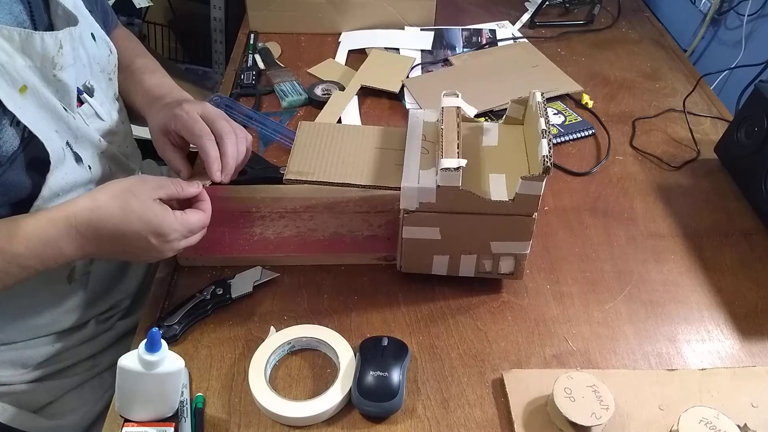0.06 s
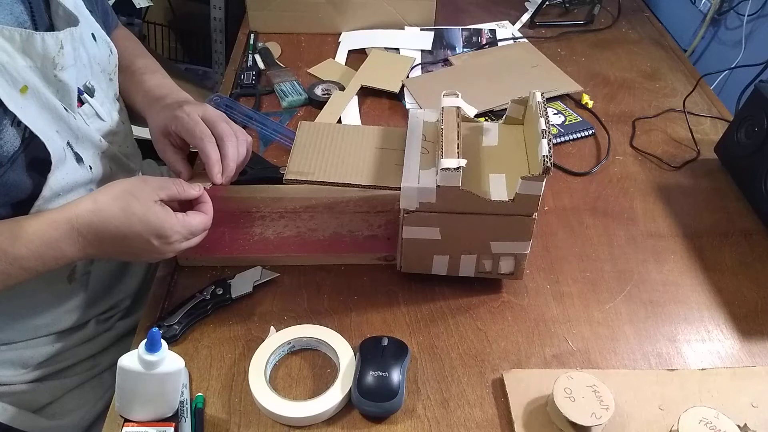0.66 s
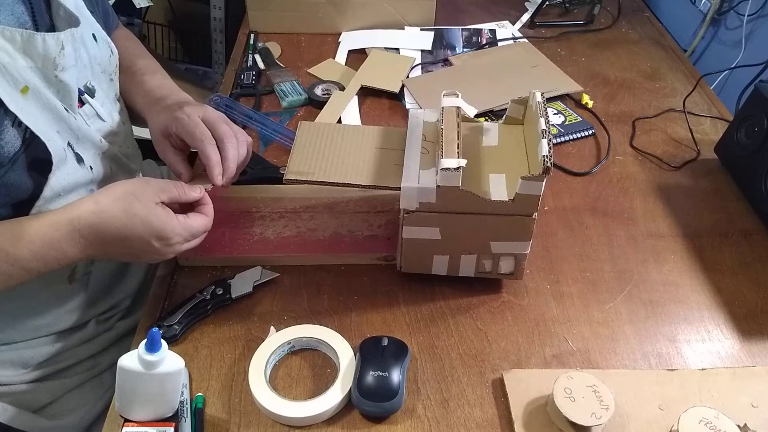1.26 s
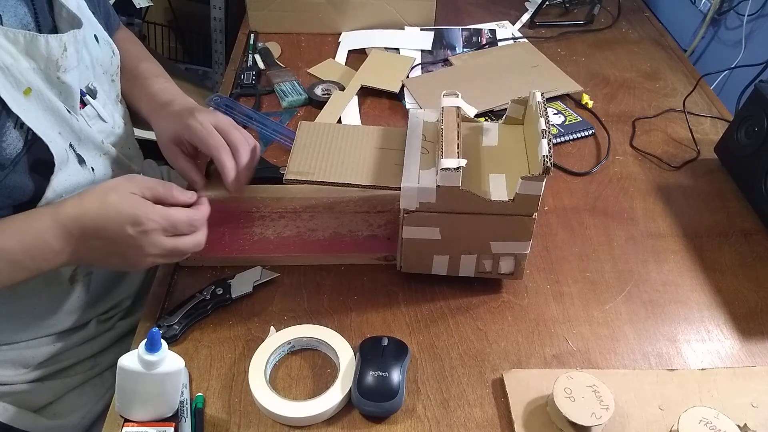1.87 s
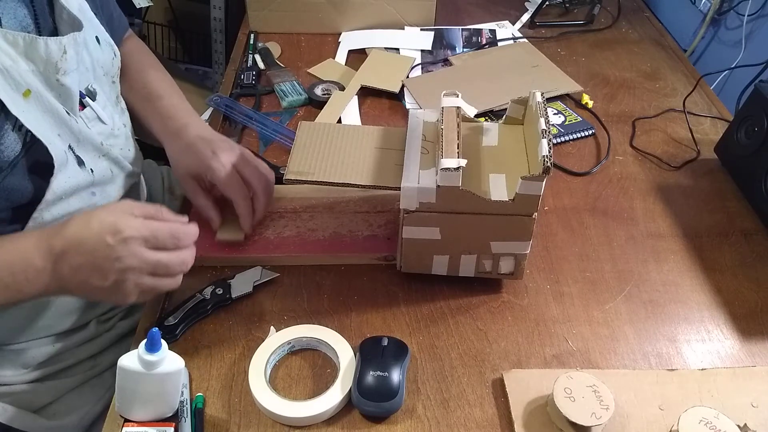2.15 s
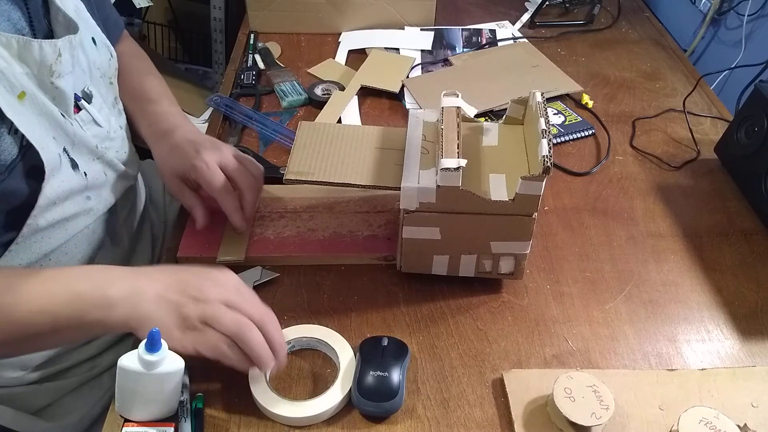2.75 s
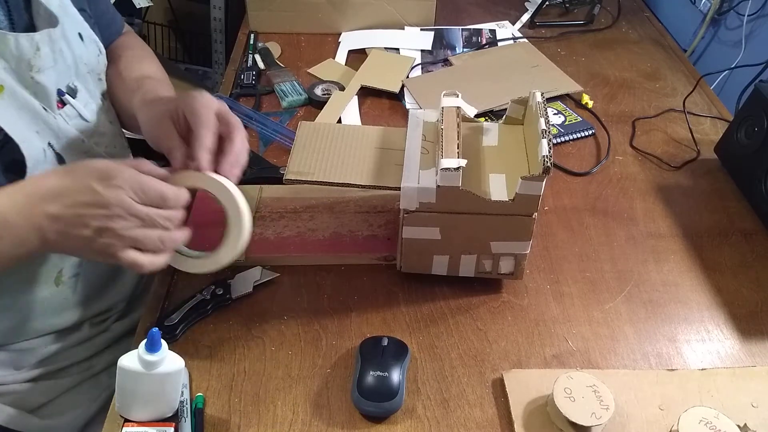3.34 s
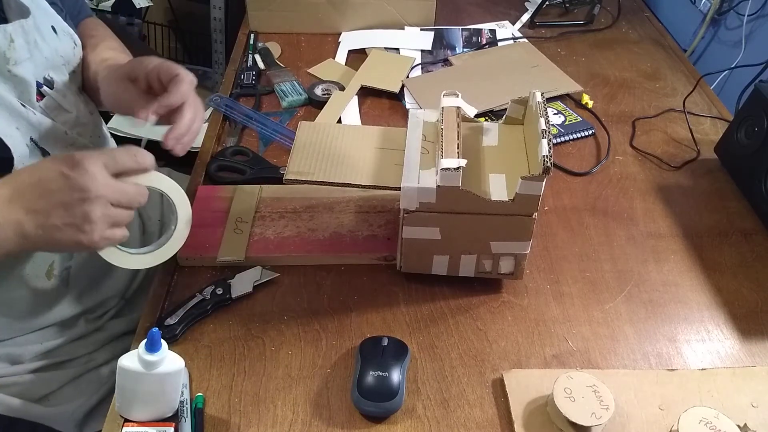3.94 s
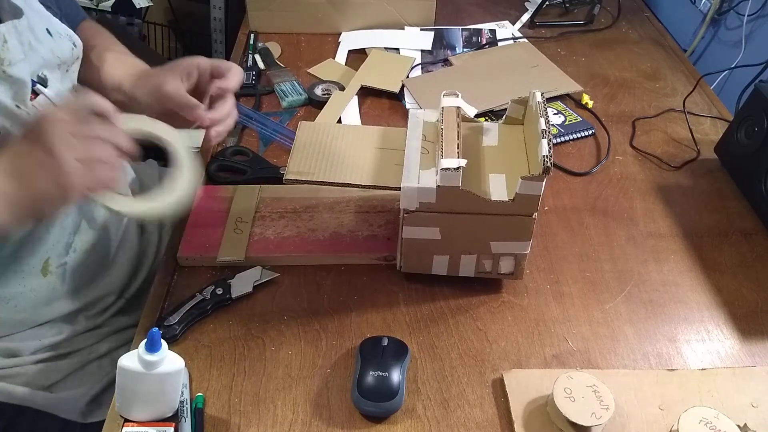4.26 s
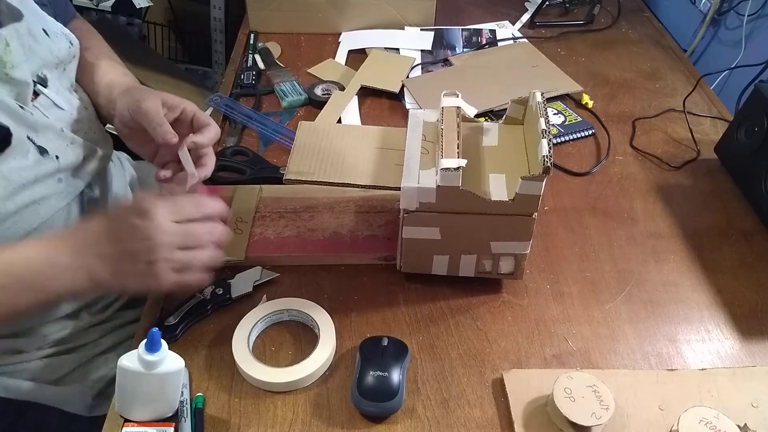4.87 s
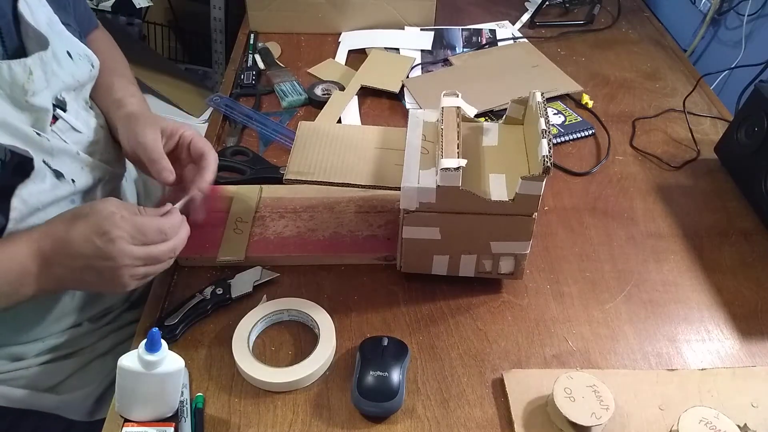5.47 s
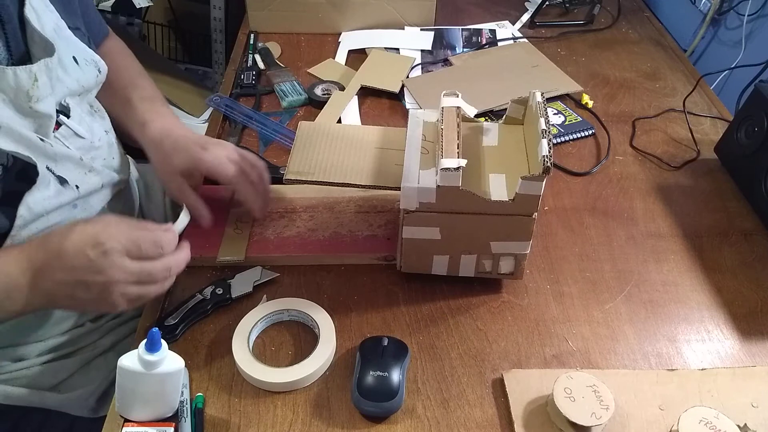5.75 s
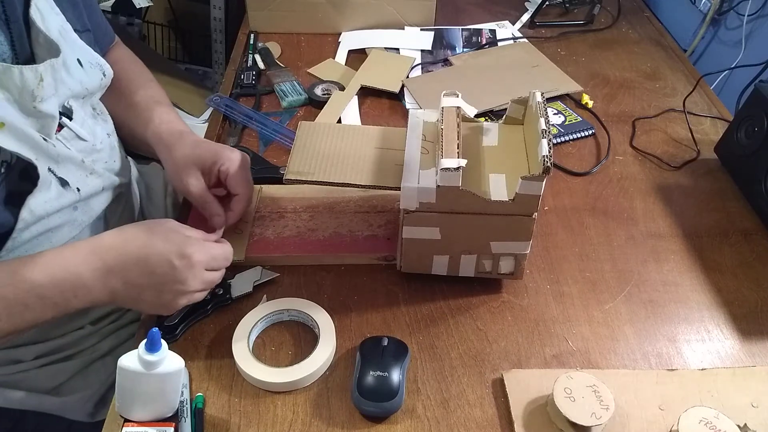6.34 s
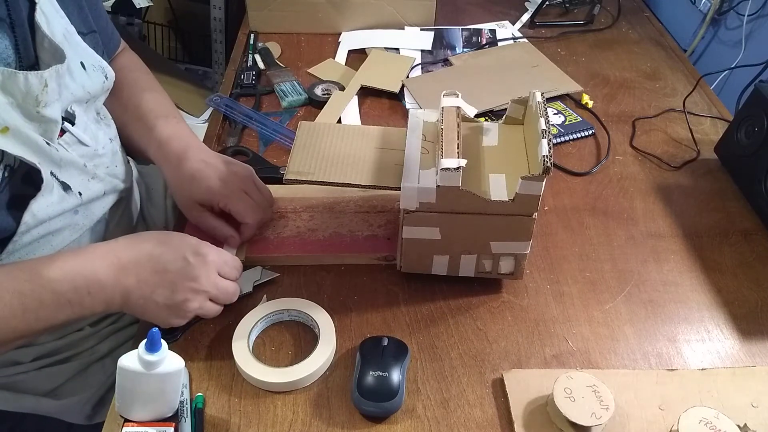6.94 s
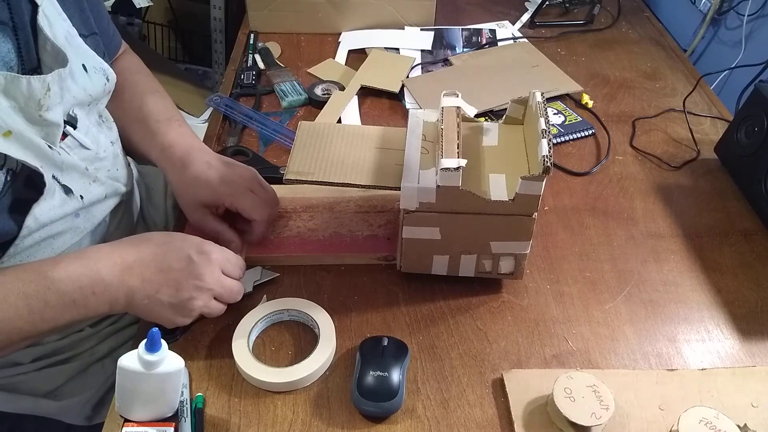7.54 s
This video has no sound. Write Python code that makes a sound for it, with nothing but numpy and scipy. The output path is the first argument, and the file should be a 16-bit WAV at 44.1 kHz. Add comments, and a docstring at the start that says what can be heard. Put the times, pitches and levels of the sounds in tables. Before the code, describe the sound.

Close by at an indoor workbench, a few quiet sticky ticks and soft knocks lead into a brief, buzzing peel of masking tape and a crisp tear. The roll lands on the wood and rattles quickly to rest, ringing slightly. Fingers then crinkle the strip and rub it faintly against cardboard. A fan's low hum and soft hiss fill the small room throughout.

```python
"""Masking tape at a wooden workbench

In a small room, tape rasps off its roll in jerks as the glue sticks and slips, then is snapped off.
The roll drops on the bench, clatters and rings; fingers crinkle the strip and rub it onto cardboard.
A fan hisses and hums throughout. The stereo image is widened, and sharp treble ducks the level."""
import sys
import numpy as np
from scipy import signal
from scipy.fft import rfft, irfft, next_fast_len
from scipy.io import wavfile
from scipy.ndimage import uniform_filter1d

SR = 44100
rng = np.random.default_rng(int(sys.argv[2]) if len(sys.argv) > 2 else 0)


def to_wav(s):
    """Save 16-bit WAV."""
    ch = np.atleast_2d(s).T  # columns
    pcm = np.round(np.clip(ch, -1, 1) * 32767)  # PCM
    wavfile.write(sys.argv[1], SR, pcm.astype(np.int16))


N = 334895
TIME = np.arange(N) / SR

# the jerks that pull tape off the roll: t/s, half length/s, level/dB, slip rate/Hz
JERKS = [(3.586, 0.019, -35.5, 278), (3.605, 0.0055, -25, 220), (3.6133, .0007, -20.5, 280),
         (3.635, 0.0064, -25, 370), (3.649, 0.0051, -22.5, 450), (3.663, 0.005, -21, 330),
         (3.69, .012, -30, 326), (3.705, 0.01, -28, 300), (3.727, 0.0091, -24.5, 330),
         (3.781, 0.02, -33.5, 230), (3.812, 0.0033, -34, 250), (3.832, 0.01, -30.5, 340),
         (3.866, 0.006, -37, 220), (3.933, 0.0095, -40, 210)]
# the roll lands, bounces twice and clatters to rest:
# t/s, level/dB, bass cut/Hz, treble cut/Hz, favoured pitch/Hz, rim crack/dB, crack treble cut/Hz
LANDINGS = [(4.6399, 5, 55, 2660, 637, -5, 6600), (4.716, 3, 120, 2780, 332, -8, 16000),
            (4.7579, 4.5, 160, 2170, 460, -25, 7000), (4.771, -2.5, 600, 2200, 900, -28, 7000),
            (4.7871, -5, 600, 2000, 900, -36, 6000), (4.828, -11, 500, 2200, 1400, -46, 6000),
            (4.866, -20, 500, 2000, 1000, -50, 6000)]


def from_db(db):
    """Decibels to gain."""
    return 10 ** (np.asarray(db) / 20)


def at_hz(points, hz):
    """Read a table on a log-frequency axis."""
    f, value = np.transpose(points)
    return np.interp(np.log(np.maximum(hz, 1)), np.log(f), value)


def low_pass(x, hz):
    """A smooth treble roll-off."""
    return signal.sosfilt(signal.butter(2, hz, fs=SR, output="sos"), x + 1e-18)


def high_pass(x, hz):
    """A smooth bass roll-off."""
    return signal.sosfilt(signal.butter(2, hz, "high", fs=SR, output="sos"), x + 1e-18)


def coloured(x, spectrum, size=4096):
    """A minimum-phase EQ with the given curve: no pre-ring ahead of a transient."""
    gain = from_db(at_hz(spectrum, np.linspace(0, SR / 2, size // 2 + 1)))
    cepstrum = irfft(np.log(gain))
    cepstrum[1:size // 2] *= 2
    cepstrum[size // 2 + 1:] = 0
    return signal.oaconvolve(x, irfft(np.exp(rfft(cepstrum))))[:N]


def resonance(x, hz, width_hz):
    """A band-pass with unity gain at its peak."""
    radius = np.exp(-np.pi * width_hz / SR)
    feedback = [1, -2 * radius * np.cos(2 * np.pi * hz / SR), radius ** 2]
    return signal.lfilter(np.array([1, 0, -1]) * (1 - radius ** 2) / 2, feedback, x + 1e-18)


def swell(s, half_s):
    """A bell-shaped rise and fall."""
    return np.exp(-.5 * np.minimum(((TIME - s) / half_s) ** 2, 100))


def spurt(s, attack_s=0.01, release_s=0.004):
    """A rise to the moment of letting go, then a faster fall."""
    return np.exp(-np.minimum(np.maximum((s - TIME) / attack_s, (TIME - s) / release_s), 20))


def crackle(per_s, spread_db):
    """Glue threads and paper fibres let go at random, with uneven strengths; rms 1."""
    sizes = from_db(spread_db * np.minimum(rng.exponential(1, N), 4))
    clicks = (rng.random(N) < per_s / SR) * sizes * rng.choice([-1, 1], N)
    return clicks / np.sqrt(np.mean(clicks ** 2) + 1e-20)


def burst(s, length_s, size=4096):
    """A short, sharp noise burst with an even spectrum."""
    out, start = np.zeros(N), round(s * SR)
    age = TIME[:size] / length_s
    envelope = np.exp(-np.minimum(age, 20) ** 2)
    phase = np.angle(rfft(envelope * rng.standard_normal(size)))
    even = irfft(np.exp(1j * phase)) * np.exp(-np.minimum(age / 3, 20) ** 2)
    out[start:start + size] = even * np.sqrt(np.sum(envelope ** 2) / np.sum(even ** 2))
    return out


def diffuse(size):
    """Spectra of white noise reaching both microphones from all sides, and their frequencies."""
    # how alike the room sounds at the two microphones: f/Hz, correlation (-1..1)
    likeness = [(40, 1), (130, 0.63), (300, 0.96), (600, 0.55), (1000, -0.094), (1600, -0.08),
                (2200, -0.23), (5000, 0.021)]
    mid, side = rfft(rng.standard_normal((2, size)))
    hz = np.linspace(0, SR / 2, len(mid))
    alike = at_hz(likeness, hz)
    return (np.sqrt(1 + alike) * mid + np.sqrt(1 - alike) * side * [[1], [-1]]) / np.sqrt(2), hz


def in_room(x, wet_db, lead_s, pan_db, bounce_db=-7.5, size=24000):
    """Direct sound (left microphone first), a scattered bounce off the bench, then the walls."""
    # the room's decay: f/Hz, T60/s
    room_t60 = [(150, 0.36), (600, 0.4), (2500, 0.2), (8000, 0.22), (14000, 0.2)]
    t = TIME[:size]
    noise, hz = diffuse(size)
    edges = np.r_[0, np.geomspace(200, SR / 2, 8)]
    decay_s = np.maximum(t - 0.0021, 0)   # early reflections briefly hold the level
    tail = np.zeros((2, size))
    for low, high in zip(edges, edges[1:]):
        band = irfft(noise * ((hz >= low) & (hz < high)))
        tail += band * from_db(-60 * decay_s / at_hz(room_t60, (low + high) / 2))
    tail *= np.minimum(t / 0.0017, 1)
    bounce = irfft(diffuse(size)[0]) * np.exp(-np.minimum(((t - .0036) / .0007) ** 2, 100))
    response = sum(from_db(db) * part / np.sqrt(np.sum(part ** 2) / 2)
                   for db, part in ((wet_db, tail), (bounce_db, bounce)))
    response[0, 0] += 1
    response[1, round(lead_s * SR)] += 1
    return signal.oaconvolve(x[None], response, axes=1)[:, :N] * from_db([[pan_db / 2], [-pan_db / 2]])


def fan(ripple_db=2.5, ripple_hz=14, waver_db=4, waver_hz=7.6):
    """A steady bed of air noise, its spectrum rippled by room modes, over a wavering motor hum."""
    # rushing air: f/Hz, noise density/dB
    air_spectrum = [(25, -75), (45, -64), (90, -70), (150, -65), (195, -68), (400, -67), (620, -70.5),
                    (1000, -77.5), (2000, -81.5), (3000, -85), (4300, -91.5), (6000, -92), (9000, -94),
                    (11000, -96), (12100, -91.5), (13200, -99.5), (15000, -99)]
    # the fan's resonances: f/Hz, width/Hz, boost/dB
    peaks = [(154.7, 9.8, 3.3), (226.3, 24, 6.6), (296.2, 15, 8), (354, 12.5, 7), (414.7, 12, 7.5),
             (503, 8.6, 7.8), (540, 10.5, 2.4), (699, 12, 6), (884, 16, 6.3), (1120, 100, 3), (1468, 12, 5)]
    # motor hum, a standing wave in the room: f/Hz, left/dB, right/dB, phase between microphones/rad
    hum_tones = [(59.5, -46.5, -47.5, 0.046), (115.7, -62, -51.5, 1.84)]
    noise, hz = diffuse(2 * next_fast_len(N // 2 + 1))
    ripple = np.interp(hz / ripple_hz, np.arange(2048), rng.standard_normal(2048))
    peaks_db = sum(db / (1 + (2 * (hz - f) / width) ** 2) for f, width, db in peaks)
    air_db = at_hz(air_spectrum, hz) + ripple_db * ripple + peaks_db
    air = irfft(noise * from_db(air_db))[:, :N] * np.sqrt(SR / 2)
    hum = sum(from_db([[left], [right]]) * np.sqrt(2) * np.sin(2 * np.pi * f * TIME + [[phase], [0]])
              for f, left, right, phase in hum_tones)
    waver = low_pass(rng.standard_normal(N + SR), waver_hz)[SR:]
    return air + hum * from_db(waver_db * waver / waver.std())


def rubbing():
    """Skin drags over paper: dense, dull grains under each stroke."""
    # hands slide over the cardboard and the roll: t/s, half length/s, level/dB
    strokes = [(0.8, 0.023, -60), (2.9, 0.046, -57), (3.013, 0.0084, -57), (5.591, 0.023, -54),
               (5.753, 0.013, -47), (5.817, 0.029, -59), (6.826, 0.034, -60)]
    # tone of skin on paper: f/Hz, gain/dB
    rub_eq = [(150, -4), (700, 17.5), (1500, 17.5), (2700, 19.5), (3500, 5), (5000, 11.5), (8000, -1),
              (15000, -6)]
    pressure = sum(from_db(db) * swell(s, half_s) for s, half_s, db in strokes)
    return coloured(pressure * crackle(per_s=2900, spread_db=-1.0), rub_eq)


def crinkling(level_db=-2):
    """Fingers stick to the tape and come away in sparse little ticks."""
    # fingers knead the tape: t/s, half length/s, level/dB
    squeezes = [(1.953, 0.024, -44.5), (2.18, 0.084, -46.5), (2.44, .02, -44.5), (2.86, .06, -52),
                (3.44, 0.074, -48), (4.084, 0.026, -47), (4.287, 0.022, -46), (4.55, 0.15, -53),
                (5.193, .03, -46), (5.484, 0.025, -37), (5.545, 0.026, -41), (6.422, 0.051, -51),
                (7.447, 0.018, -48), (7.574, 0.022, -50)]
    # a fingertip lifts off the glue: t/s, level/dB
    lifts = [(1.95, -51), (2.278, -45), (2.356, -46), (3.001, -41), (3.468, -48), (3.518, -51),
             (3.547, -35.5), (4.338, -31), (5.364, -25), (5.436, -43), (5.572, -37), (5.66, -33.5),
             (5.685, -41), (6.267, -45), (6.762, -41), (7.387, -39)]
    # thin, bright tone of the ticks: f/Hz, gain/dB
    crinkle_eq = [(300, -57), (2000, -41), (4000, -10.5), (6000, -4), (10000, -1.5), (12400, 5),
                  (15000, -16)]
    touch = sum(from_db(db) * swell(s, half_s) for s, half_s, db in squeezes)
    touch += sum(from_db(db) * spurt(s) for s, db in lifts)
    return coloured(from_db(level_db) * touch * crackle(per_s=1200, spread_db=4.5), crinkle_eq)


def contacts():
    """Every knock on the bench: t/s, level/dB, bass cut/Hz, treble cut/Hz, favoured pitch/Hz."""
    # hands softly bump the bench and pick up the roll: t/s, level/dB
    bumps = [(1.997, -17), (2.854, -18), (2.873, -19), (2.877, -13), (2.909, -17.5), (2.930, -18),
             (2.972, -21)]
    return [(s, db, 59, 530, 526) for s, db in bumps] + [row[:5] for row in LANDINGS]


def thuds(level_db=-2.5):
    """Each contact is a short push on the bench top, duller when soft, thinner when glancing."""
    # the dull body of a knock: f/Hz, gain/dB
    thud_eq = [(40, 14), (90, 16), (140, 25.5), (350, 22), (750, 21.5), (1100, 13.5), (1800, 19),
               (2500, 14), (3500, 9.5), (4600, 1), (8000, 4), (15000, 0)]
    pushes = np.zeros(N)
    for s, db, bass_hz, treble_hz, _ in contacts():
        push = low_pass(signal.unit_impulse(N, round(s * SR)), treble_hz)
        pushes += from_db(db) * high_pass(push, bass_hz)
    return from_db(level_db) * coloured(pushes, thud_eq)


def knock_ring(ring_db=8.5, favour_db=10, favour_octaves=.25, size=14000):
    """The room and the roll's hollow core ring on after each knock; where it lands favours some modes."""
    # modes of the room and the roll: f/Hz, level/dB, T60/s
    modes = [(150, -41, .25), (221, -38, .22), (290, -38, .13), (365, -32, .11), (414, -42, .13),
             (483, -34, .15), (570, -34, .17), (678, -43, .16), (712, -35, .16), (785, -38, .15),
             (823, -40, .16), (899, -34.5, .17), (967, -40, .17), (1012, -40, .18), (1174, -45, .16),
             (1265, -44, .14), (1329, -46, .18), (1380, -45, .18), (1470, -45, .15), (1583, -42, .14),
             (1720, -43, .2), (1790, -42, .15), (1910, -41, .15), (2040, -41, .15), (3480, -50, .1)]
    t, out = TIME[:size], np.zeros((2, N))
    hz, mode_db, t60 = np.transpose(modes)[:, :, None]
    attack = 1 - np.exp(-t / 0.0015)
    envelopes = from_db(mode_db + ring_db - 60 * t / t60) * attack
    for s, db, bass_hz, treble_hz, favoured_hz in contacts():
        boost_db = favour_db * np.exp(-.5 * (np.log2(hz / favoured_hz) / favour_octaves) ** 2)
        mic_phase = rng.normal(0, 0.49, (2, len(hz), 1))
        phase = mic_phase + rng.uniform(0, 2 * np.pi, hz.shape)
        ring = np.sum(from_db(db + boost_db) * envelopes * np.sin(2 * np.pi * hz * t + phase), axis=1)
        start = round(s * SR)
        out[:, start:start + size] += high_pass(low_pass(ring, treble_hz), bass_hz)
    return out


def rim_cracks(length_s=0.0011):
    """The hard rim of the roll slaps the wood, brighter when it lands on its edge."""
    # tone of the slap: f/Hz, gain/dB
    crack_eq = [(300, -15), (1000, -13), (2300, -10), (3300, -4), (4300, 0), (6000, -6), (9000, -14),
                (15000, -26)]
    slaps = sum(from_db(db) * low_pass(burst(s, length_s), hz) for s, *_, db, hz in LANDINGS)
    return coloured(slaps, crack_eq)


def stick_slip(threads, wander=0.09, depth_db=16, click_db=1, uneven_db=3):
    """The glue lets go with a click and grips again, hundreds of times a second: a buzzing rasp."""
    s, _, _, slip_hz = np.transpose(JERKS)
    jitter = low_pass(rng.standard_normal(N), hz=107.5)
    rate_hz = np.interp(TIME, s, slip_hz) * np.exp(wander * jitter / jitter.std())
    slips = np.cumsum(rate_hz) / SR
    grip = from_db(-depth_db * (slips % 1))
    clicks = np.diff(np.floor(slips), prepend=0) * from_db(uneven_db * rng.uniform(-1, 1, N))
    return threads * grip / np.sqrt(np.mean(grip ** 2)) + from_db(click_db) * clicks / clicks.std()


def peeling(level_db=-1, start_m=0.0121, end_m=0.129, wave_m_per_s=196.4, damping=0.053):
    """Each jerk breaks a swarm of glue threads; the freed strip rings, lower as it grows longer."""
    # tone of the peel: f/Hz, gain/dB
    peel_eq = [(150, -34), (600, 1.5), (1100, -6), (1600, -4), (2800, -8.5), (3800, -8), (4800, -4.5),
               (7000, -4.5), (10000, -2), (11600, 2), (12250, 2), (12800, 1.5), (13500, -4), (15000, -35)]
    rasp = stick_slip(crackle(per_s=9000, spread_db=1.0))
    jerks = [from_db(db + level_db) * swell(s, half_s) for s, half_s, db, _ in JERKS]
    jerk_db = np.transpose(JERKS)[2]
    peeled = np.cumsum(sum(jerks))
    strip_m = start_m + (end_m - start_m) * peeled / peeled[-1]
    out = np.zeros(N)
    for jerk, slack_db in zip(jerks, jerk_db.max() - jerk_db):
        strip_hz = wave_m_per_s / (2 * strip_m[jerk.argmax()])
        radiated = high_pass(jerk * rasp, 0.67 * strip_hz)
        out += radiated
        for overtone, hz in enumerate(strip_hz * np.arange(1, 4)):
            if hz < SR / 2:
                ring_db = 8 - 3 * slack_db - 0.5 * overtone   # a taut strip rings most
                out += from_db(ring_db) * resonance(radiated, hz, damping * strip_hz)
    return coloured(out, peel_eq)


def snapping():
    """The loudest snap tears the strip off; in the others it flicks free of the fingers."""
    # snaps of the tape: t/s, length/s, level/dB, bass cut/Hz
    snaps = [(2.357, .001, -38, 3000), (2.3955, 0.0014, -31, 1200), (4.1, 0.0019, -4, 150),
             (4.3235, 0.0024, -24.5, 4000), (5.348, .002, -37, 8000), (5.358, .002, -33, 5000),
             (5.3617, 0.0024, -26, 600), (5.5645, 0.0058, -32, 1510), (6.163, 0.042, -44, 300)]
    # sharp tone of tearing tape: f/Hz, gain/dB
    tear_eq = [(200, -24), (1200, -22), (2800, -0.5), (4200, 1.5), (5600, 0.5), (8000, 2.5), (12000, 8.5),
               (15000, -8)]
    bursts = sum(from_db(db) * high_pass(burst(s, length_s), hz) for s, length_s, db, hz in snaps)
    return coloured(bursts, tear_eq)


def scene():
    """Tape, hands and roll close by in the small room, over the fan."""
    tape = in_room(peeling() + crinkling() + rubbing(), wet_db=3.5, lead_s=.0003, pan_db=-1.0)
    tear = in_room(snapping(), wet_db=-2, lead_s=.00016, pan_db=-0.5)
    thud = in_room(thuds(), wet_db=2.8, lead_s=.00019, pan_db=8.0)
    rim = in_room(rim_cracks(), wet_db=-0.5, lead_s=.00028, pan_db=-3.0, bounce_db=-14)
    return tape + tear + thud + rim + knock_ring() + fan()


def widened(x, share=0.87, delay_s=0.0004405, fade_hz=4600):
    """Each channel has a delayed, duller copy of the other taken away from it."""
    size = 2 * next_fast_len(N // 2 + 64)
    spectra = rfft(x, size)
    hz = np.linspace(0, SR / 2, spectra.shape[1])
    crossfeed = share * np.exp(-2j * np.pi * hz * delay_s) / np.sqrt(1 + (hz / fade_hz) ** 8)
    return irfft(spectra - crossfeed * spectra[::-1])[:, :N]


def gain_control(x, threshold_db=-32.5, slope=.46, release_db_per_s=8.5):
    """Sharp treble ducks the gain at once; it then creeps back up."""
    treble_power = uniform_filter1d(np.mean(high_pass(x, 7000) ** 2, axis=0), size=96)
    treble_db = 10 * np.log10(np.abs(treble_power) + 1e-12)
    cut_db = slope * np.maximum(treble_db - threshold_db, 0)
    release_db = release_db_per_s * TIME
    held_db = np.maximum.accumulate(cut_db + release_db) - release_db
    return x * from_db(-uniform_filter1d(held_db, size=32))


def record(dry, cutoff_hz=14500):
    """Stereo widening, gain control and a steep top cut."""
    top_cut = signal.ellip(10, .2, 80, cutoff_hz, fs=SR, output="sos")
    return signal.sosfilt(top_cut, gain_control(widened(dry)))


dry = scene()
out = record(dry)
to_wav(out)
```